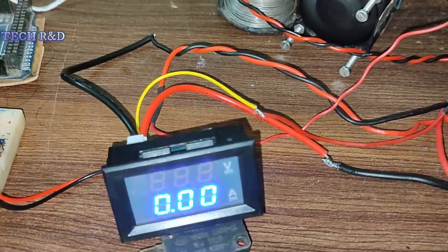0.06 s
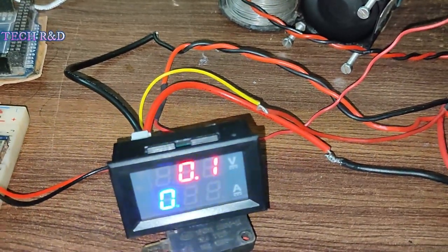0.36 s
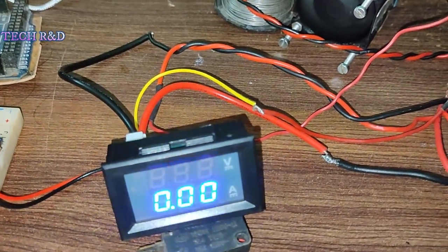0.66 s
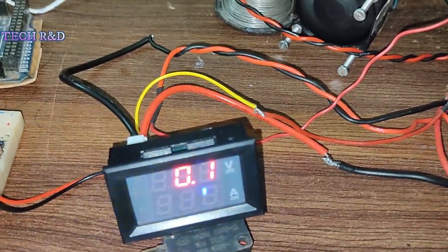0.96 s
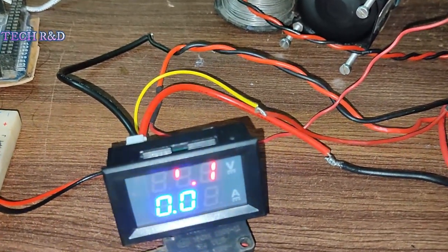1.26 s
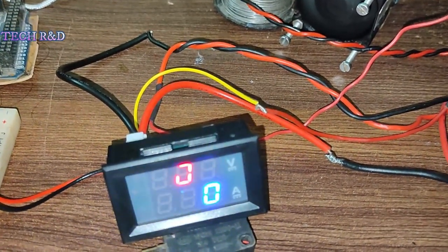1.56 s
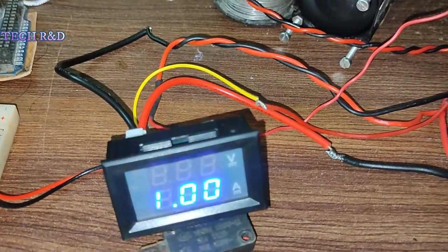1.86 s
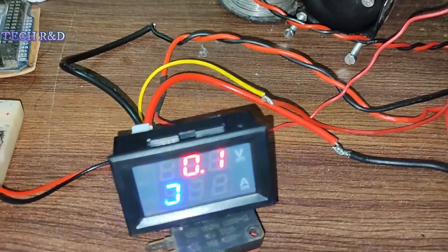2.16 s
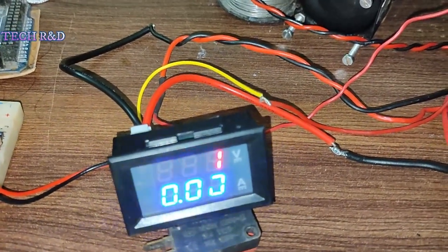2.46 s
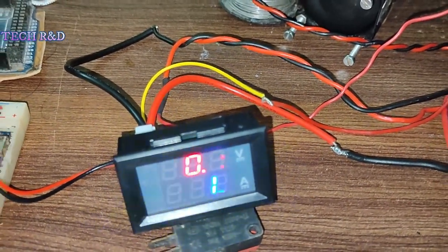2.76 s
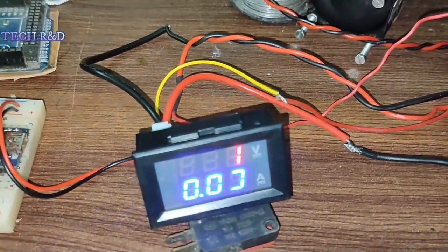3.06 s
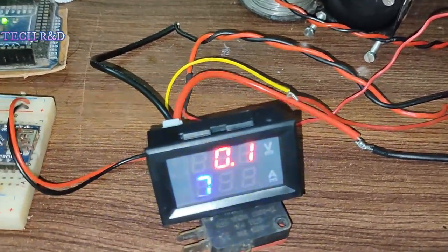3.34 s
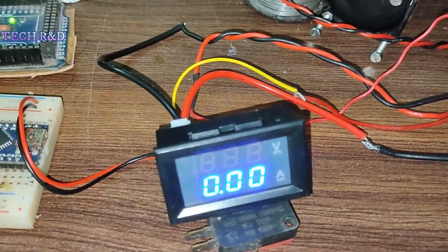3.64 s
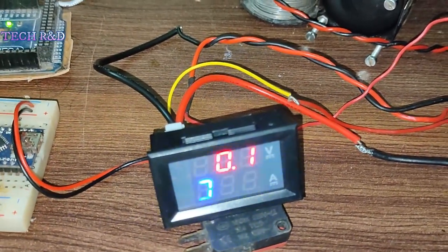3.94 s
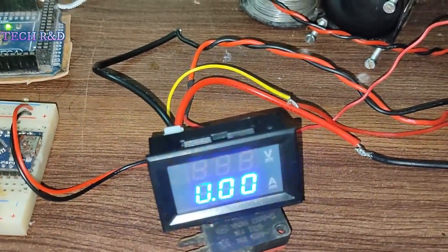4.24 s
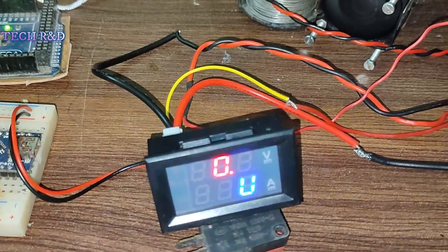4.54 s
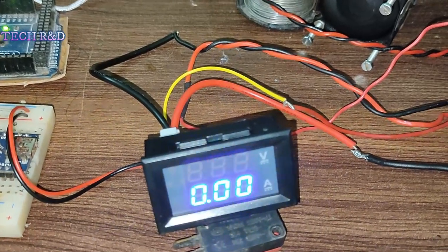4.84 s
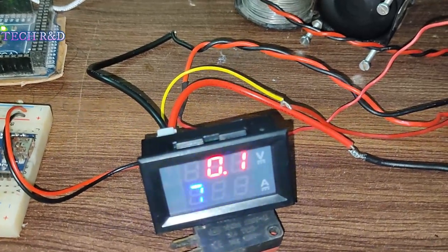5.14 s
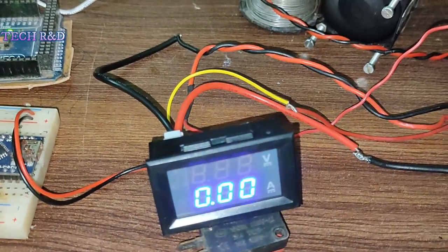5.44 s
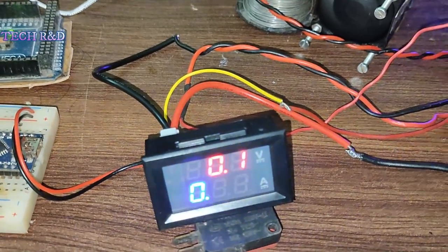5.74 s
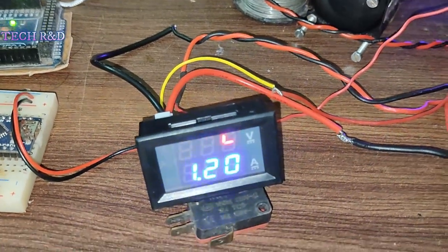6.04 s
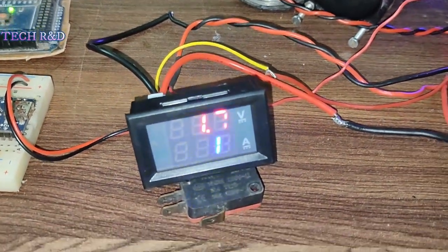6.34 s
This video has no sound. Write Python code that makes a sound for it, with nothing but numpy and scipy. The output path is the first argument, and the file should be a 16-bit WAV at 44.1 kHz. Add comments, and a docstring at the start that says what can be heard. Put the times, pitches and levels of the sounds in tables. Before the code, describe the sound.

Two small cooling fans run on a workbench, close to a hand-held stereo microphone, for the whole six and a half seconds. One holds a steady, mid-pitched whine; the faster one sits higher and hunts slightly in speed, its thin whistles swelling and fading. Faint wavering motor tones lie behind them. Air rushes through the housings throughout, with a softly surging howl and a high hiss toward the left. Draught buffets the microphone, mostly on the right: a low puff and thump right at the start, then a cluster of rumbles and dull thumps from about 0.9 to 1.8 seconds. Softer puffs follow near 2.1 seconds, around 3 seconds, at 4.3 and 4.7 seconds, and from about 5.7 to 6.1 seconds. The overall sound is slightly hollow, and the fans keep running at much the same level to the end.

```python
"""The whine of two small cooling fans on a workbench, close to a hand-held phone's stereo microphone.
One fan holds a steady blade tone, a faster one hunts in speed. Behind them are wavering motor tones
and the rush, howl and hiss of air through the housings. Now and then the draught buffets and thumps
the microphone ports. The whole sound is doubled 17 ms apart, which hollows it."""
import sys
import numpy as np
from scipy import signal
from scipy.fft import rfft, irfft
from scipy.io import wavfile

SR = 44100
rng = np.random.default_rng(int(sys.argv[2]) if len(sys.argv) > 2 else 0)


def file_out(sig):
    """Save sig as 16-bit WAV at sys.argv[1]."""
    # one column per channel
    cols = np.atleast_2d(sig).T
    # limit, then scale
    lim = np.clip(cols, -1, 1)
    pcm = np.round(lim * 32767).astype(np.int16)
    wavfile.write(sys.argv[1], SR, pcm)


N = 286650
TIME = np.arange(N) / SR
FREQ = np.arange(N // 2 + 1) * SR / N + 1e-3
PORT_LAG_S = 7e-5  # the left microphone port is nearer to the fans


def undb(db):
    """Decibels to gain."""
    return 10 ** (np.asarray(db) / 20)


def unit_rms(x):
    """Scale to rms 1."""
    return x / np.sqrt(np.mean(x ** 2))


def curve(table):
    """Timed values joined by straight lines."""
    return np.interp(TIME, *np.transpose(table))


def wander(rate_hz):
    """Smooth random motion with spread 1, mostly slower than rate_hz."""
    return unit_rms(irfft(rfft(rng.standard_normal(N)) * np.exp(-(FREQ / rate_hz) ** 2), N))


def port_noise():
    """Spectra of white noise at both ports: alike in the middle range, unrelated in bass and treble."""
    common, left, right = rfft(rng.standard_normal((3, N)))
    share = 0.88 / (1 + (FREQ / 3400) ** 3) / (1 + (330 / FREQ) ** 3)
    lag = np.exp(-2j * np.pi * FREQ * PORT_LAG_S)
    alike = np.sqrt(share) * np.array([common, common * lag])
    return alike + np.sqrt(1 - share) * np.array([left, right])


def port_tone(pitch_hz, cycles, left_db, right_db, swell_db, flutter_db):
    """One tone that reaches the left port first; turbulence makes its level flutter."""
    phase = 2 * np.pi * (cycles + rng.random())
    left = undb(left_db) * np.sin(phase)
    right = undb(right_db) * np.sin(phase - 2 * np.pi * pitch_hz * PORT_LAG_S)
    return np.sqrt(2) * np.array([left, right]) * undb(swell_db + flutter_db * wander(35))


def band_flicker(sound, bands=9, centres_hz=(1600, 14000), flicker_db=0.9):
    """The sound flickers slightly, band by band in the upper range."""
    position = np.interp(np.log(FREQ), np.log(centres_hz), [0, bands - 1])
    spectrum = rfft(sound)
    out = 0
    for k in range(bands):
        band = irfft(spectrum * np.clip(1 - abs(position - k), 0, 1), N)
        out += band * undb(flicker_db * wander(9))
    return out


# Base spectrum of the air at the microphone: frequency_hz, left_db_per_hz, right_db_per_hz
AIR_SPECTRUM = [(30, -89, -90), (120, -92, -85.5), (207, -89, -94), (249, -75.5, -73.5), (392, -86.5, -86),
                (527, -84, -91), (813, -76.5, -77.5), (1120, -77.5, -79.5), (1780, -82.5, -76),
                (2280, -71.5, -79), (3000, -77, -77), (3030, -70.5, -80.5), (3160, -76, -95),
                (3780, -77.5, -78), (4140, -76, -84), (4930, -74, -84), (5260, -88, -91.5),
                (6700, -75.5, -90), (9050, -78.5, -92), (13500, -77, -99), (15300, -90, -102)]
# Slow swell of its middle range: time_s, gain_db
RUSH_SWELL = [(0.0, -1.8), (1.1, -0.7), (1.5, 0.4), (3.1, -0.9), (3.65, -0.9), (4.55, -2.5), (5.8, -1.6),
              (6.5, -0.5)]


def air_rush(body_db=-1.25, flicker_db=1.45):
    """Turbulent air behind the tones; the middle range swells and flickers, the treble is smoother."""
    hz, *ports_db = np.transpose(AIR_SPECTRUM)
    density = undb([np.interp(np.log(FREQ), np.log(hz), db) for db in ports_db])
    air = port_noise() * density * np.sqrt(SR / 2)
    lowpass = 1 / (1 + (FREQ / 4500) ** 3)
    body = irfft(air * lowpass, N) * undb(body_db + curve(RUSH_SWELL) + flicker_db * wander(36))
    treble = irfft(air * (1 - lowpass), N) * undb(0.3 * wander(14))
    return band_flicker(body + treble)


# Puffs of draught right on the microphone: centre_s, length_s, left_db, right_db
DRAUGHT_PUFFS = [(0.053, 0.041, -53, -44), (0.887, 0.023, -61, -38), (1.003, 0.094, -69, -50),
                 (1.152, 0.1, -65, -41.5), (1.323, 0.046, -57, -43.5), (1.49, 0.072, -62, -41.5),
                 (1.6, 0.077, -56, -42), (1.66, 0.054, -50, -37.5), (1.74, 0.06, -44, -46),
                 (1.778, 0.027, -52, -44), (2.066, 0.026, -66, -42), (2.188, .1, -54, -51),
                 (2.938, 0.063, -64, -45), (3.12, 0.14, -50, -52), (4.305, 0.038, -60, -45),
                 (4.747, 0.22, -67, -48), (5.662, 0.03, -69, -46), (6.04, 0.27, -62, -52)]


def buffeting(calm_db=(-64, -58), gust_db=3.0, soft_hz=150, hard_hz=340, hard_db=-36.0):
    """Eddies strike each port separately; the harder the puff, the higher its rumble reaches."""
    ports = []
    for side in range(2):
        power = undb(calm_db[side] + gust_db * wander(10)) ** 2
        for centre_s, length_s, *levels_db in DRAUGHT_PUFFS:
            width_s = length_s / 2 * (1 + 0.075 * np.sign(TIME - centre_s))  # slower fall than rise
            power += undb(levels_db[side]) ** 2 * np.exp(-((TIME - centre_s) / width_s) ** 2)
        eddies = rfft(rng.standard_normal(N)) * FREQ / np.hypot(FREQ, 10)
        soft, hard = (unit_rms(irfft(eddies / np.sqrt(1 + (FREQ / hz) ** 6), N))
                      for hz in (soft_hz, hard_hz))
        force = np.clip(np.sqrt(power) / undb(hard_db), 0, 1)
        ports.append(np.sqrt(power) * (soft + force * (hard - soft)))
    return np.array(ports)


# Single hard eddies on the right microphone port: centre_s, pitch_hz, peak_db
HARD_EDDIES = [(.061, 190, -33), (.8815, 180, -29.5), (.8865, 320, -24.5), (.992, 150, -37),
               (1.181, 190, -32), (1.2075, 260, -26.5), (1.465, 280, -32), (1.502, 230, -32),
               (1.611, 90, -30), (1.647, 340, -25.5), (1.662, 150, -25.5), (1.684, 170, -30.5),
               (1.699, 90, -31.5)]


def thumps():
    """Each hard eddy is one dull push of pressure, with a suck before and after it."""
    right = np.zeros(N)
    for centre_s, pitch_hz, peak_db in HARD_EDDIES:
        phase = np.pi * pitch_hz * (TIME - centre_s)
        right += undb(peak_db) * (1 - 2 * phase ** 2) * np.exp(-phase ** 2)
    return np.array([np.zeros(N), right])


def housing_resonance(pitch_hz, width_hz, left_db, right_db, swell_db, flicker_db):
    """Air blows a steep-sided resonance of a fan housing in uneven surges."""
    detuning = (FREQ / pitch_hz - pitch_hz / FREQ) * pitch_hz / (1.73 * width_hz)
    ring = unit_rms(irfft(port_noise() / (1 + 1j * detuning) ** 2, N))
    return ring * undb([[left_db], [right_db]]) * undb(swell_db + flicker_db * wander(20))


# Low housing resonance, left of the microphone: pitch_hz, width_hz, left_db, right_db
HOWL_RESONANCE = (1350, 185, -40.5, -49.5)
# Its slow swell: time_s, gain_db
HOWL_SWELL = [(0.0, 2), (0.07, 4.8), (0.17, 3.6), (0.3, -0.3), (0.95, 0.3), (1.25, -3.8), (1.38, 0.9),
              (1.8, -0.6), (2.9, -1.3), (3.7, 1.1), (3.95, -0.8), (4.6, -1.8), (4.87, 2), (5.05, -0.5),
              (5.35, 2.6), (5.6, -0.2), (6.3, -1.3), (6.4, 2.2), (6.5, 2.4)]


def housing_howl(surge_db):
    """Air howls in the low resonance, with quick surges on top of its slow swell."""
    return housing_resonance(*HOWL_RESONANCE, curve(HOWL_SWELL) + surge_db, flicker_db=2.16)


# High housing resonance, hard left: pitch_hz, width_hz, left_db, right_db
HISS_RESONANCE = (6011, 755, -36, -64)
# Its slow swell: time_s, gain_db
HISS_SWELL = [(0.0, -0.3), (0.5, 0.0), (1.05, -2.5), (1.15, 2.0), (1.35, 1.6), (1.48, -1.4), (1.7, 1.5),
              (2.0, -1.5), (2.6, 0.4), (3.2, 1.1), (3.8, -0.9), (4.04, 1.8), (4.25, -1.0), (4.95, 0.3),
              (5.15, 2.5), (5.4, -1.4), (5.63, 1.5), (6.15, -1.7), (6.5, -0.8)]


def housing_hiss(surge_db):
    """Air hisses in the high resonance, more evenly than it howls."""
    return housing_resonance(*HISS_RESONANCE, curve(HISS_SWELL) + surge_db, flicker_db=1.05)


# Faint motor tones from the bench: pitch_hz, left_db, right_db
MOTOR_TONES = [(530, -64.7, -64.7), (817, -61.5, -63.5), (917, -66, -72), (2193, -58.5, -68),
               (2879, -60, -65), (3567, -65, -70), (4256, -55.5, -65), (4944, -57.5, -73), (5631, -50, -72)]


def motors(speed_spread=0.000628, jitter_hz=1.94, sway_db=1.6):
    """Motor tones waver together with the speed, each trembling a little on its own."""
    speed = 1 + speed_spread * wander(1.4)
    out = 0
    for pitch_hz, *levels_db in MOTOR_TONES:
        cycles = np.cumsum(pitch_hz * speed + jitter_hz * wander(28.2)) / SR
        out += port_tone(pitch_hz, cycles, *levels_db, sway_db * wander(9.1), flutter_db=2.5)
    return out


# Hum, blade tone and two whistles of the fast fan, close up: shaft_multiple, left_db, right_db
FAST_FAN_TONES = [(1, -57, -61), (5, -47.9, -45.4), (15, -49.8, -59.5), (20, -48.7, -77)]
# Its speed: time_s, shaft_hz
SHAFT_SPEED = [(0.0, 301.7), (0.3, 299.8), (1.0, 300.7), (1.27, 302.2), (1.52, 300.9), (1.75, 301.4),
               (2.48, 301.0), (2.85, 301.9), (3.15, 301.4), (3.47, 299.5), (3.92, 301.6), (4.5, 302.4),
               (4.88, 301.1), (5.08, 301.4), (5.3, 300.2), (5.58, 301.3), (5.92, 301.8), (6.5, 300.6)]
# Swells of its blade tone, thin whistle and top whistle: time_s, gain_db
BLADE_SWELL = [(0.0, 1), (0.55, 2.3), (1.0, -.5), (1.6, .5), (2.1, -.3), (2.5, 2), (2.9, -1.3), (3.65, 2.7),
               (4.15, -3), (4.7, -1.5), (5.22, 2.3), (5.45, -1.2), (6.5, 0)]
WHISTLE_SWELL = [(0.0, -3), (0.4, -3), (0.6, -10), (1.05, -6), (1.25, 1.5), (1.78, 4.5), (1.92, -10),
                 (2.1, -9), (2.25, 5), (2.7, 1.5), (3.05, 5.5), (3.35, -5), (3.9, 3.3), (4.2, 0.5),
                 (4.45, 3), (5.1, 1.5), (5.27, -2.5), (5.53, 5.5), (5.7, 2), (5.88, 7), (6.3, 9),
                 (6.5, 5.5)]
TOP_WHISTLE_SWELL = [(0.0, -2), (0.85, -7), (1.05, -3), (1.2, 7), (1.35, 7.5), (1.48, -2), (1.62, 6),
                     (1.76, 7.5), (1.92, -4), (2.55, 3.5), (3.2, 4.5), (3.75, -4), (4.03, 8), (4.5, -3),
                     (5.15, 5.5), (5.42, -2), (5.63, 5), (6.0, 2.5), (6.5, -5)]


def fast_fan(jitter_hz=0.18, hum_sway_db=1.6):
    """The smaller, five-bladed fan hunts in speed; its tones glide together and swell separately."""
    shaft_hz = curve(SHAFT_SPEED) + jitter_hz * wander(19)
    turns = np.cumsum(shaft_hz) / SR
    hum_db = hum_sway_db * wander(5)
    swells_db = [hum_db, curve(BLADE_SWELL), curve(WHISTLE_SWELL), curve(TOP_WHISTLE_SWELL)]
    out = 0
    for (k, *levels_db), swell_db in zip(FAST_FAN_TONES, swells_db):
        out += port_tone(k * shaft_hz, k * turns, *levels_db, swell_db, flutter_db=1.4)
    return out


# Whine of the steady fan, close up: harmonic, left_db, right_db
BLADE_HARMONICS = [(1, -49, -48), (2, -46.7, -57.7), (3, -57.3, -57.3), (4, -49.6, -53.6), (5, -64.5, -72),
                   (6, -56.5, -71.5), (7, -68, -78), (8, -56.5, -74), (9, -57.5, -78)]


def steady_fan(howl_surge_db, blade_hz=687.6, drift_hz=0.209, sway_db=2.4):
    """Blades pass at a steady rate; harmonic 2 swells with the howl, harmonic 4 with the rush."""
    cycles = np.cumsum(blade_hz + drift_hz * wander(2.67)) / SR
    swells_db = {1: 0.65 * wander(3), 2: curve(HOWL_SWELL) + howl_surge_db, 4: 1.2 * curve(RUSH_SWELL)}
    out = 0
    for k, *levels_db in BLADE_HARMONICS:
        swell_db = swells_db.get(k, sway_db * wander(4))
        flutter_db = {1: 0.7, 4: 2.1}.get(k, 3.5)  # harmonics 1 and 4 flutter least
        out += port_tone(k * blade_hz, k * cycles, *levels_db, swell_db, flutter_db)
    return out


def scene():
    """Fan tones, moving air and draught as they reach the two ports beside the fans."""
    howl_surge_db = 0.75 * wander(9)
    hiss_surge_db = 0.375 * wander(9)
    whine = steady_fan(howl_surge_db) + fast_fan() + motors()
    air = air_rush() + housing_howl(howl_surge_db) + housing_hiss(hiss_surge_db)
    return whine + air + buffeting() + thumps()


def record(dry, lead_samples=768, bass_gain=0.48, treble_gain=0.29, top_hz=15450):
    """A faint copy 17 ms ahead, weaker in the treble, combs the sound; then the top is cut."""
    copy_gain = treble_gain + (bass_gain - treble_gain) / (1 + (FREQ / 2000) ** 2)
    comb = 1 + copy_gain * np.exp(2j * np.pi * FREQ * lead_samples / SR)
    hollow = irfft(rfft(dry) * comb, N)
    return signal.sosfilt(signal.ellip(10, 0.2, 70, top_hz, fs=SR, output="sos"), hollow)


dry = scene()
out = record(dry)
file_out(out)
```